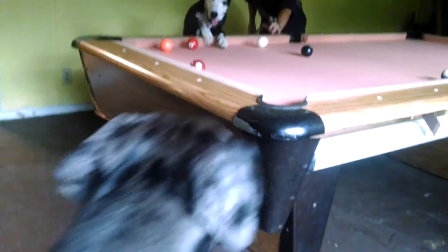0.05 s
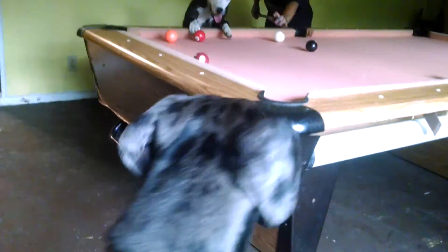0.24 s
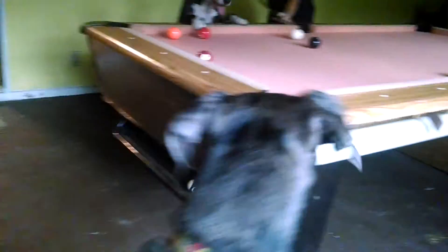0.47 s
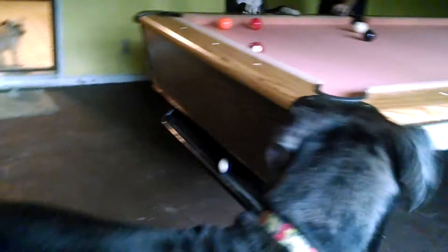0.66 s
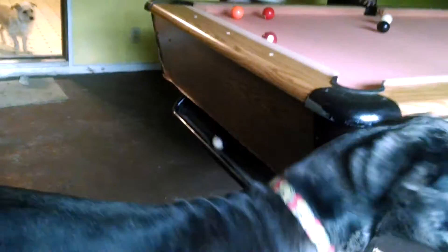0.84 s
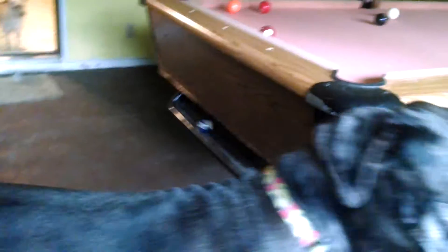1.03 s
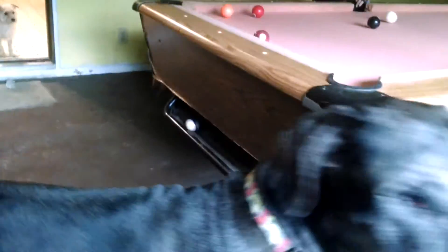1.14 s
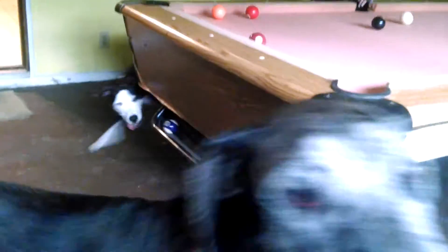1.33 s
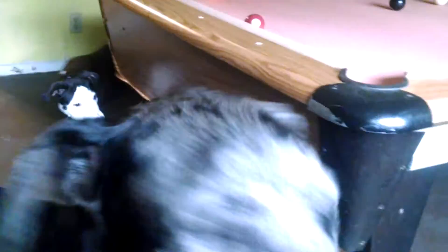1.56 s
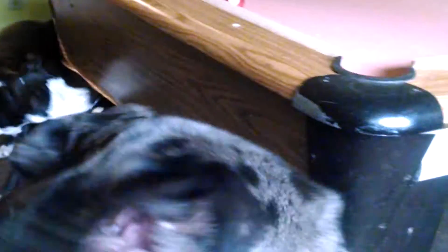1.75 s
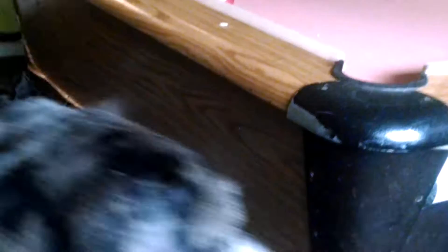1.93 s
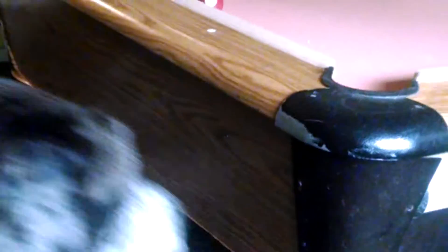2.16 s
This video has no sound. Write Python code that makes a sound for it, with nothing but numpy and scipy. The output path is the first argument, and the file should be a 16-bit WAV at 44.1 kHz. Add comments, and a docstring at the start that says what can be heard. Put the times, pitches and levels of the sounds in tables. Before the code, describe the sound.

A pool ball drops into a pocket with a few knocks, lands hard on the return rail, rolls away and clacks at the far end. A dog's coat rustles close to the microphone, and a machine hums in the bare room.

```python
"""Pool ball in the return rail

A ball drops into a pocket, knocks down through the wooden table and lands hard on the return rail.
It rolls along and clacks twice at the far end; each impact excites the table's modes and the bare room.
A machine hums and whines. Close by, a dog's coat rustles and something ticks, probably claws or collar.
The gain control ducks at the hard landing and creeps back up."""
import sys
import numpy as np
from scipy import signal
from scipy.fft import rfft, irfft, next_fast_len
from scipy.io import wavfile
from scipy.ndimage import uniform_filter1d, map_coordinates

SR = 44100
rng = np.random.default_rng(int(sys.argv[2]) if len(sys.argv) > 2 else 0)


def wav_out(sig):
    """Save sig, one row per channel (or a flat mono array), as 16-bit PCM at SR to the path in sys.argv[1]."""
    wavfile.write(sys.argv[1], SR, np.round(np.clip(np.atleast_2d(sig).T, -1, 1) * 32767).astype(np.int16))


N = 97020
TIME = np.arange(N) / SR


def amp(db):
    """Amplitude ratio of a level in decibels."""
    return 10 ** (np.asarray(db) / 20)


def unit(x):
    """Normalisation to rms 1."""
    return x / np.sqrt(np.mean(x ** 2) + 1e-20)


def along(points, hz):
    """Interpolation of (f/Hz, value) points on a logarithmic frequency axis."""
    f, values = np.transpose(points)
    return np.interp(np.log(hz + 1), np.log(f + 1), values)


def wobble(per_s):
    """Random modulation: a spline through per_s Gaussian values a second."""
    return map_coordinates(rng.standard_normal(N // 20), [TIME * per_s], mode="wrap")


def since(onset):
    """Time elapsed since the onset, zero before it."""
    return np.maximum(TIME - onset, 0)


def decay(t, t60):
    """Exponential damping after a sudden start: 60 dB in t60 seconds."""
    return (t > 0) * np.exp(-np.log(1000) * t / t60)


def filtered(x, response):
    """Linear filtering: the spectrum of x times a complex frequency response."""
    size = next_fast_len(N + SR // 4)
    hz = np.fft.rfftfreq(size, 1 / SR)
    return irfft(rfft(x, size) * response(hz), size)[..., :N]


def noise(colour_db):
    """Partly coherent stereo noise of rms 1: the ratio of mid to side sets the correlation."""
    # likeness of left and right (f/Hz, correlation)
    correlation = [(60, 0.31), (400, 0.68), (1300, 1), (2200, 0.82), (4000, 0.91), (8000, 0.49), (13000, 1)]
    def response(hz):
        angle = np.arccos(np.clip(along(correlation, hz), -1, 1)) / 2
        return amp(colour_db(hz)) * [np.cos(angle), np.sin(angle)]
    mid, side = filtered(rng.standard_normal((2, N)), response)
    return unit(np.array([mid + side, mid - side]))


def machine():
    """Superposition of broadband air noise, two narrow-band whines and a wavering motor hum."""
    # spectrum of the air noise (f/Hz, relative level/dB)
    air_spectrum = [(25, -12.5), (90, -5), (170, -4), (230, -4), (420, 1), (1000, -3.5), (1700, -10.5),
                    (2800, -6), (3900, -5.5), (5000, -14), (9000, -16), (14500, -19.5)]
    # whine bands (f/Hz, half width/Hz, level/dB)
    whines = [(2068, 73, -37.5), (3906, 43, -47.5)]
    air = amp(-33) * noise(lambda hz: along(air_spectrum, hz))
    whine = sum(amp(db) * noise(lambda hz: -20 * np.log10(1 + ((hz - centre) / width) ** 2))
                for centre, width, db in whines)
    hum_hz, channel_phase_rad = 58, np.array([[0], [0.7]])
    hum_rms = amp(-46.5 + 1.1 * wobble(per_s=3.56))
    hum = hum_rms * np.sqrt(2) * np.sin(2 * np.pi * hum_hz * TIME + channel_phase_rad)
    return air + whine + hum


def rustles():
    """Friction noise: a dog's coat and collar brush in soft, grainy strokes."""
    # Gaussian strokes (centre t/s, standard deviation/s, level/dB)
    strokes = [(0.072, 0.019, -33.5), (0.144, 0.18, -38.5), (0.905, .02, -31.5), (1.01, 0.052, -31),
               (1.39, .03, -32.5), (1.537, 0.03, -31.5), (1.624, .04, -51), (2.017, 0.073, -40),
               (2.177, 0.021, -36)]
    # spectrum of brushed fur (f/Hz, relative level/dB)
    spectrum = [(800, -34), (3000, -4), (6500, 1), (9000, 0), (14500, 3)]
    envelope = sum(amp(db) * np.exp(-.5 * ((TIME - centre) / width) ** 2)
                   for centre, width, db in strokes)
    grain = amp(3.5 * wobble(per_s=240))
    return envelope * unit(grain * noise(lambda hz: along(spectrum, hz)))


def ticks():
    """Direct sound of tiny bright impacts, too near and weak for reverberation to be heard."""
    # taps (t/s, level/dB)
    taps = [(0.4955, -13.5), (.5208, -19), (2.0145, -15.5), (2.0398, -22)]
    # spectrum of a tap (f/Hz, relative level/dB)
    spectrum = [(1500, -48), (4500, -4.5), (9000, -12), (15000, -8)]
    envelope = sum(amp(db) * decay(since(onset), t60=0.013) for onset, db in taps)
    return envelope * noise(lambda hz: along(spectrum, hz))


def rolling():
    """Forced vibration: the receding ball rumbles unevenly and drives the rail's resonances."""
    # course of the rumble (t/s, level/dB)
    course = [(.53, -44), (.62, -30.5), (1.0, -31), (1.25, -28.5), (1.38, -28.5), (1.48, -28),
              (1.62, -31.5), (1.72, -35.5), (1.9, -37), (2.2, -42.5)]
    # spectrum of the rolling contact (f/Hz, relative level/dB)
    spectrum = [(60, -28), (160, -0.5), (220, -11), (340, 6), (700, -0.5), (1350, 3), (1750, -9),
                (3800, -17), (5500, -39), (14000, -22.5)]
    # resonances of the rail (f/Hz, half width/Hz, lift/dB)
    resonances = [(174, 17, 6), (341, 9.9, 5), (378, 6.7, -1), (505, 10, 7.5), (676.3, 9, 13.5),
                  (972, 11, 10.5)]
    def colour_db(hz):
        peaks_db = sum(db / (1 + ((hz - centre) / width) ** 2) for centre, width, db in resonances)
        return along(spectrum, hz) + peaks_db
    level_db = np.interp(TIME, *np.transpose(course))
    bumps_db = 2 * wobble(per_s=50)
    return amp(level_db + bumps_db) * noise(colour_db)


def reverberation(x, onset):
    """Diffuse field: the noise x builds up from the onset, then each band decays at its own rate."""
    # reverberation time of the room (f/Hz, t60/s)
    room_t60 = [(100, 0.34), (400, 0.85), (1000, 0.61), (4000, 0.61), (8000, 0.59), (14000, 0.4)]
    build_s = 0.01
    hz, t, bands = signal.stft(x, SR, nperseg=256)
    damping = np.exp(-np.log(1000) * np.maximum(t - onset, 0) / along(room_t60, hz)[:, None])
    tail = signal.istft(bands * damping, SR)[1][:, :N]
    return tail * (1 - np.exp(-since(onset) / build_s))


def knock(onset, db, bass_db, treble_db, main_hz, lift_db, push_db, t60, room_db):
    """Impact excitation: a first push, the wood's dense clatter, free modal ringing and reverberation."""
    # spectrum of ball on wood (f/Hz, relative level/dB)
    wood = [(60, -31), (140, -18.5), (230, -13.5), (340, -5), (600, -6.5), (1300, -7), (1750, -10),
            (2600, -5.5), (4000, -5), (5200, -10.5), (9000, -14), (14500, -11.5)]
    # modes of the table and its rail (f/Hz, relative level/dB, t60/s)
    modes = [(165.6, -28, 0.36), (265.3, -22.5, 0.4), (353.2, -20.5, 0.53), (374.4, -11, 0.53),
             (429, -16.5, 0.73), (677.4, -12.5, 0.37), (719, -19.5, 0.73), (875.5, -18, 0.59),
             (1003, -24, 0.98), (1105, -25.5, 0.7), (1273, -22.5, 0.53), (1395, -25, 0.55),
             (1480, -22, 0.65), (4110, -29, 0.74)]
    bass_hz, treble_hz, lift_octaves, channel_spread_rad = 544, 2130, 0.3, 0.5
    def contact_db(hz):
        bass = bass_db / (1 + (hz / bass_hz) ** 3)
        treble = treble_db * (1 - 1 / (1 + (hz / treble_hz) ** 3))
        resonance = lift_db * np.exp(-.5 * (np.log2((hz + 1) / main_hz) / lift_octaves) ** 2)
        return bass + treble + resonance
    def colour_db(hz):
        return along(wood, hz) + contact_db(hz)
    t = since(onset)
    push = -amp(push_db) * np.sin(2 * np.pi * main_hz * t) * decay(t, t60=0.01)
    clatter = noise(colour_db) * decay(t, t60)
    ring = np.zeros((2, N))
    for hz, mode_db, mode_t60 in modes:
        strength = amp(mode_db + contact_db(hz) + rng.normal(0, 1))
        phase = 2 * np.pi * rng.random() + rng.normal(0, channel_spread_rad, (2, 1))
        ring += strength * decay(t, mode_t60) * np.sin(2 * np.pi * hz * t + phase)
    room = amp(room_db) * reverberation(noise(colour_db), onset)
    return amp(db) * (push + clatter + ring + room)


def ball_impacts():
    """Superposition of the ball's knocks on the wooden table and rail, with the deep bass filtered out."""
    # knocks (t/s, level/dB, bass/dB, treble/dB, main resonance f/Hz, its lift/dB,
    # first push/dB, clatter t60/s, room/dB)
    impacts = [(0.2146, -17, 3, -25, 880, 1.5, 10, 0.15, 0.5),
               (.2328, -20.5, 10, -38, 526, 2.5, 15, 0.081, -0.5),
               (0.2586, -9, -32, 0.5, 3700, 0, -8, 0.076, -9),
               (.4030, -9.5, -10.5, -9.5, 950, 5.5, -8, 0.15, -7),
               (.4620, -24, -10, -8, 510, 17, -8, 0.36, -6),
               (.5307, 8, -1, -0.5, 1257, 7.5, 7.5, 0.13, -0.5),
               (1.555, -26, -30, -17, 1920, 7, 6, 0.057, -7),
               (1.6038, -23, -11, -20, 1200, -1.5, -14, 0.14, -7.5),
               (1.7081, -15.5, -7.5, 1, 1230, 3, -20, 0.15, -9.5),
               (1.752, -23.5, -1, -6, 990, 0, 11, 0.12, -8),
               (1.8826, -21, -9.5, -17, 1400, 9, -4, 0.39, -12),
               (1.8889, -16.5, -18, 4, 1310, 6.5, 10.5, 0.1, -7.5)]
    cutoff_hz = 132
    high_pass = signal.butter(4, cutoff_hz, "high", fs=SR, output="sos")
    return signal.sosfilt(high_pass, sum(knock(*impact) for impact in impacts))


def scene():
    """Linear superposition of all sources, left and right."""
    return ball_impacts() + ticks() + rustles() + rolling() + machine()


def microphones(hz):
    """Interchannel phase and level: in step up to the midrange; above it the left is late and inverted."""
    # left over right (f/Hz, level/dB)
    balance = [(60, -2), (200, -1), (600, -1), (1300, 0.5), (4000, -1.5), (9000, -1.4), (14000, -.8)]
    in_step_hz, lag_s = 1580, 0.000389
    phase = np.interp(hz, [0, in_step_hz, 1 / lag_s, SR], [0, 0, -np.pi, np.pi - 2 * np.pi * SR * lag_s])
    share = np.array([[.5], [-.5]])
    return amp(share * along(balance, hz)) * np.exp(1j * share * phase)


def record(dry):
    """Automatic gain control (fast attack, slow release) after the microphones; clipping, band limit."""
    ceiling_db, release_db_per_s, window_s, top_hz = -11.5, 9, 0.017, 15600
    x = filtered(dry, microphones)
    power = uniform_filter1d(np.mean(x ** 2, axis=0), int(window_s * SR))
    level_db = 10 * np.log10(np.abs(power) + 1e-12)
    duck_db = np.minimum(ceiling_db - level_db, 0)
    climb_db = release_db_per_s * TIME
    gain_db = np.minimum.accumulate(duck_db - climb_db) + climb_db
    delayed_gain_db = np.interp(TIME - 0.4 * window_s, TIME, gain_db)
    clipped = np.clip(x * amp(delayed_gain_db), -1, 1)
    return filtered(clipped, lambda hz: hz < top_hz)


dry = scene()
out = record(dry)
wav_out(out)
```